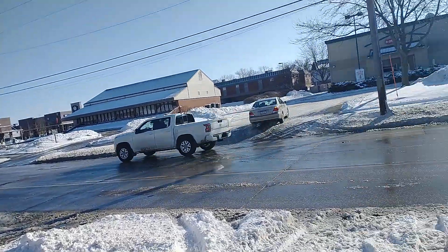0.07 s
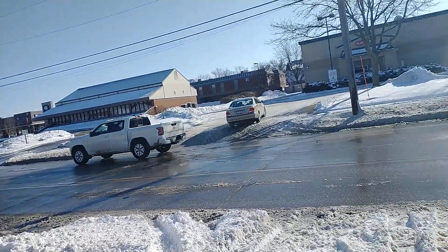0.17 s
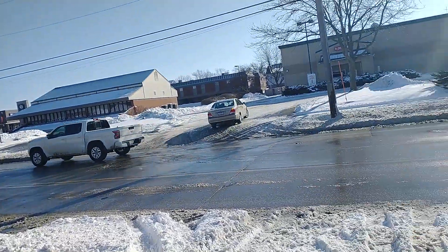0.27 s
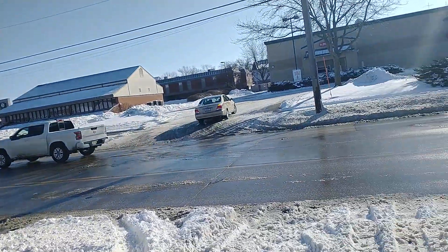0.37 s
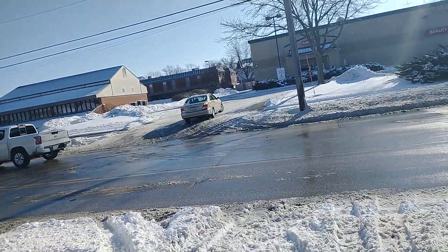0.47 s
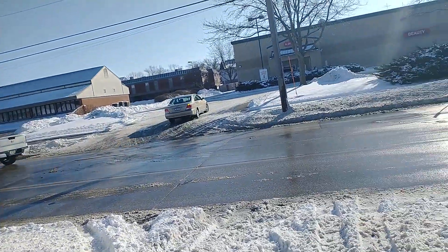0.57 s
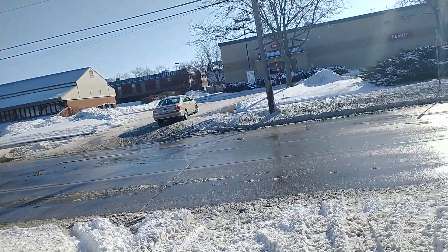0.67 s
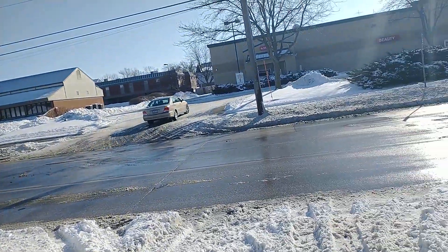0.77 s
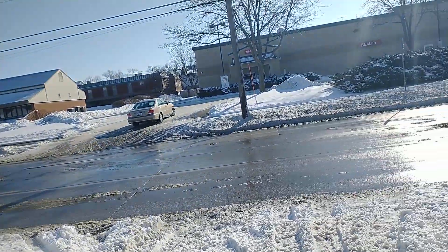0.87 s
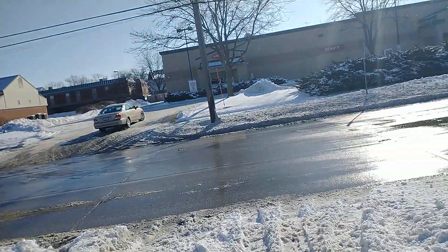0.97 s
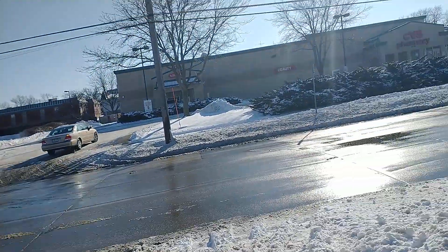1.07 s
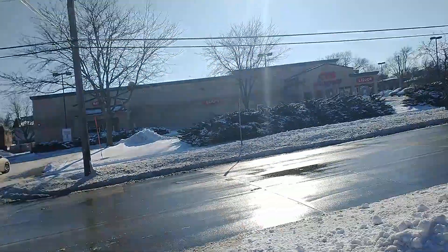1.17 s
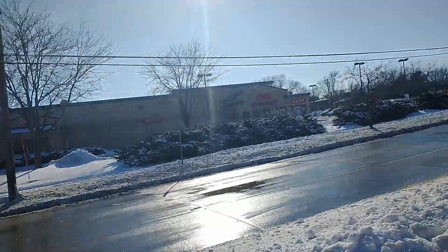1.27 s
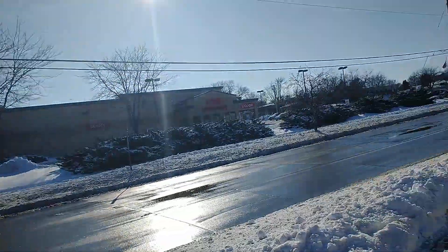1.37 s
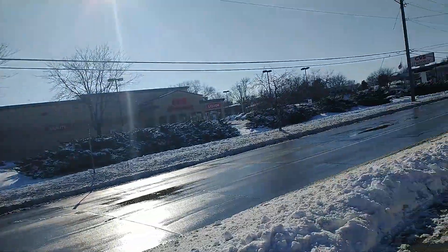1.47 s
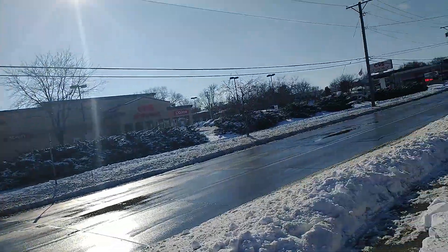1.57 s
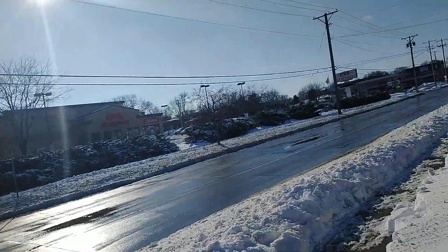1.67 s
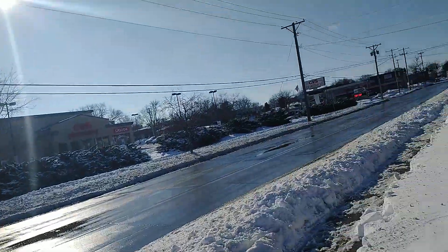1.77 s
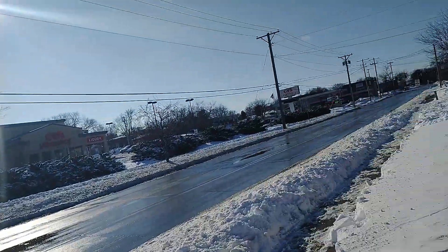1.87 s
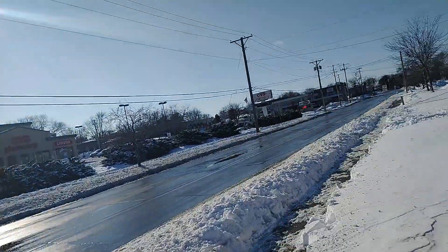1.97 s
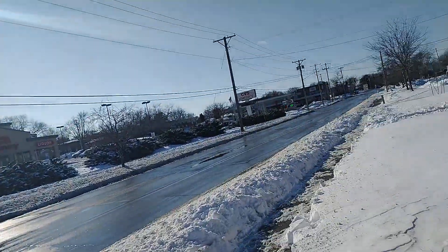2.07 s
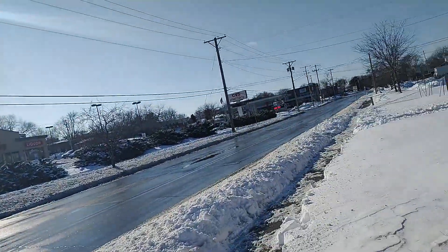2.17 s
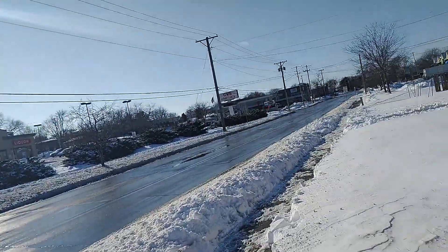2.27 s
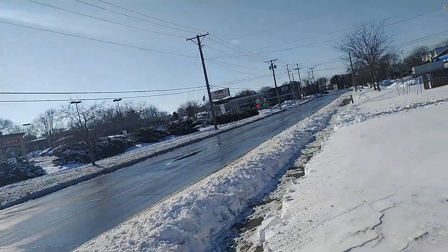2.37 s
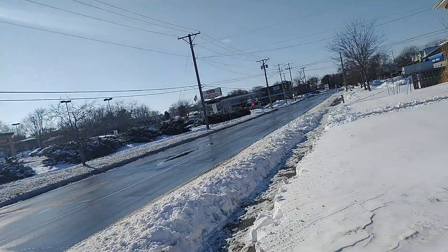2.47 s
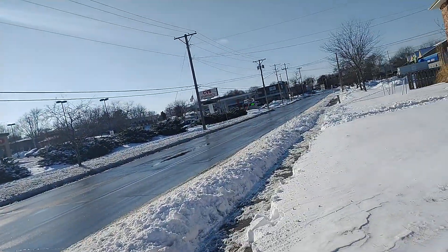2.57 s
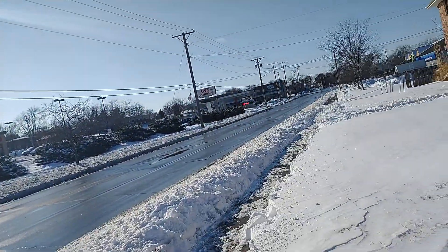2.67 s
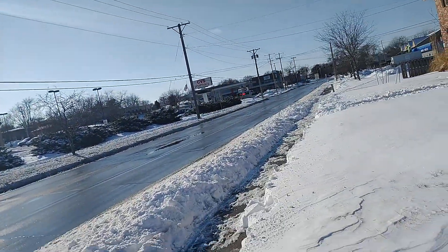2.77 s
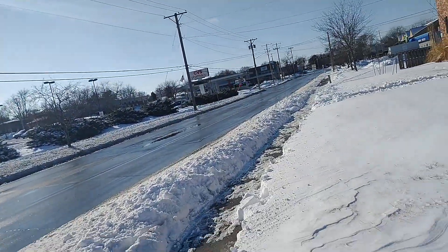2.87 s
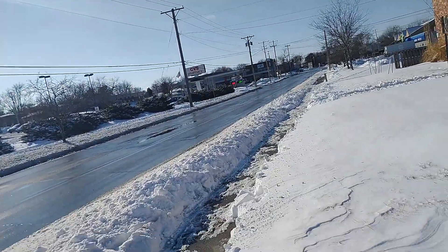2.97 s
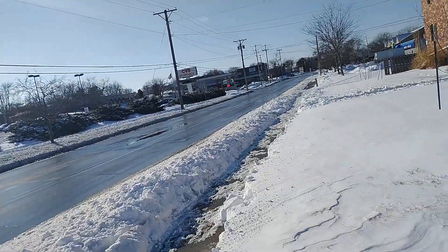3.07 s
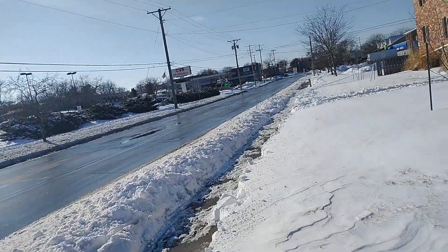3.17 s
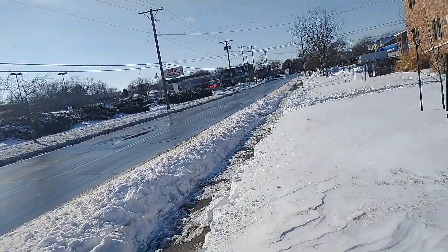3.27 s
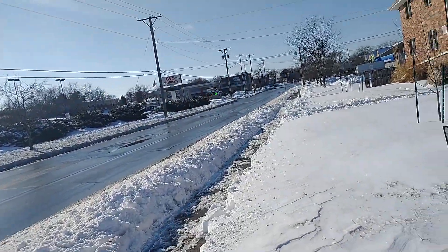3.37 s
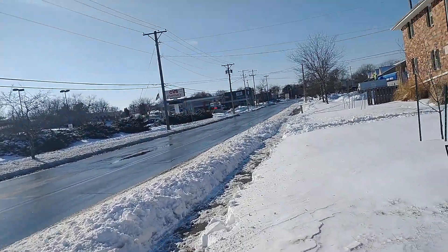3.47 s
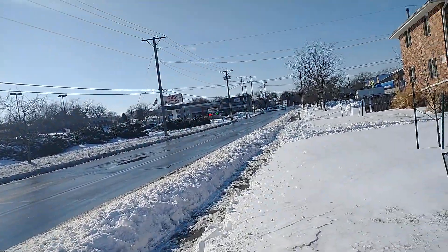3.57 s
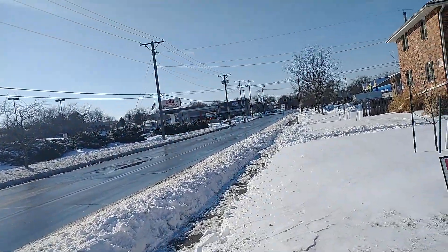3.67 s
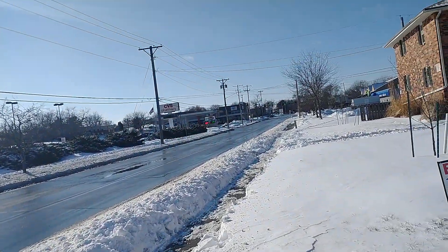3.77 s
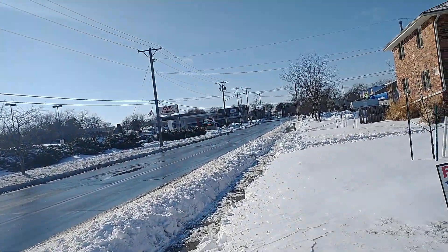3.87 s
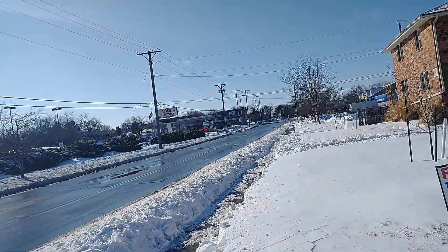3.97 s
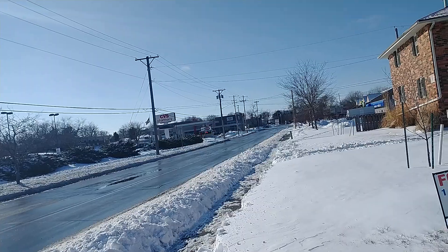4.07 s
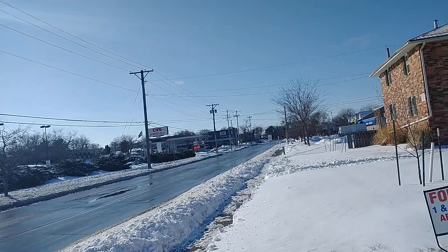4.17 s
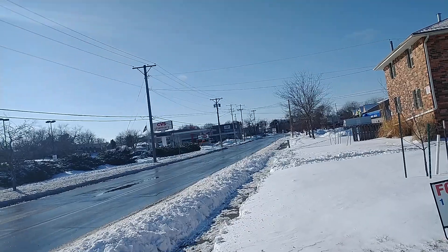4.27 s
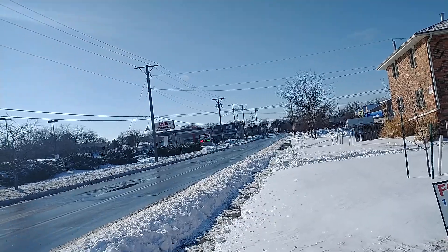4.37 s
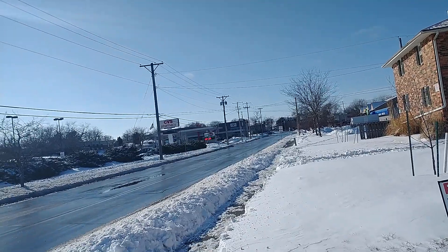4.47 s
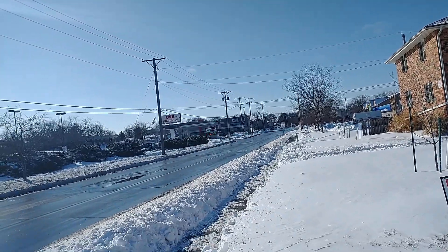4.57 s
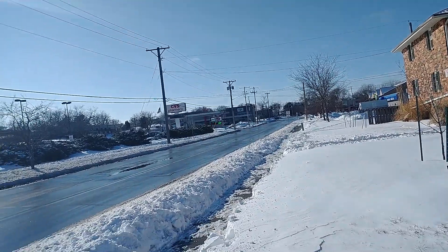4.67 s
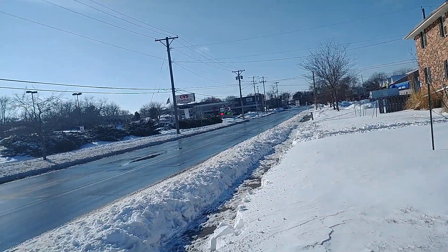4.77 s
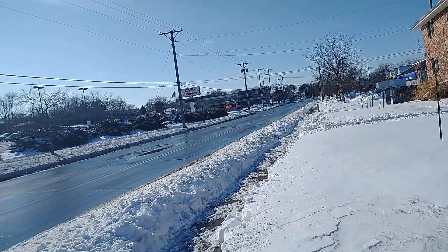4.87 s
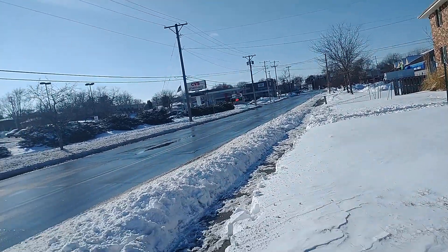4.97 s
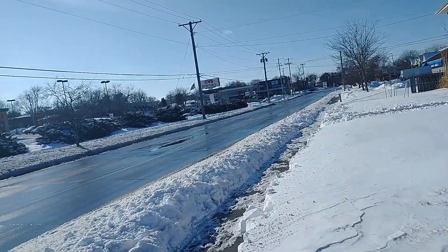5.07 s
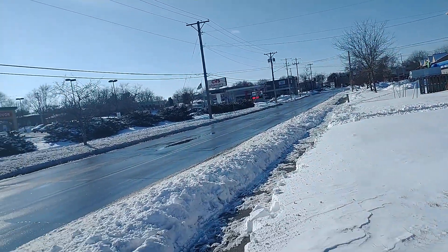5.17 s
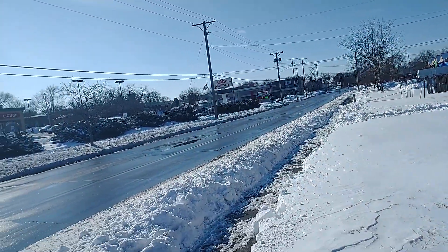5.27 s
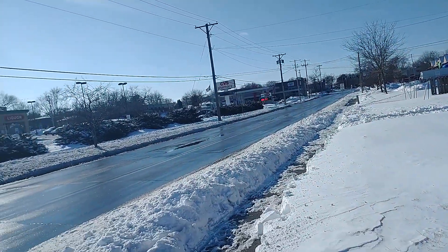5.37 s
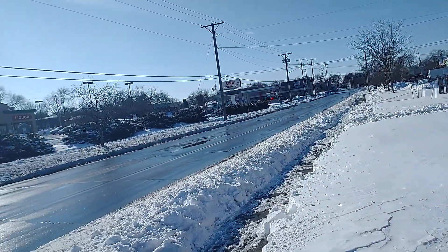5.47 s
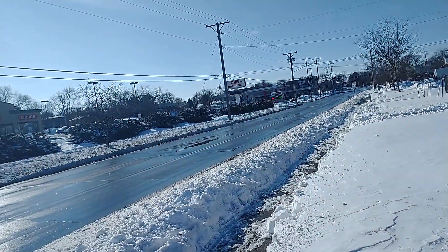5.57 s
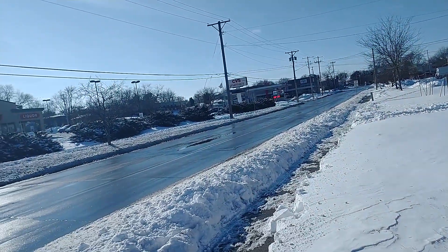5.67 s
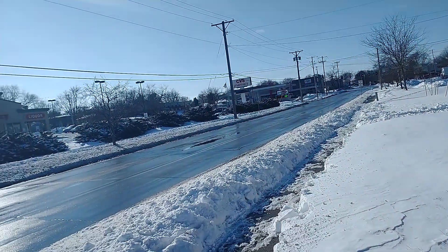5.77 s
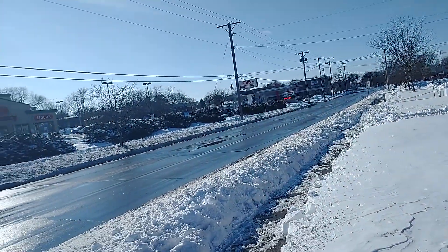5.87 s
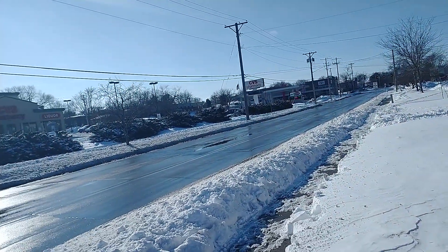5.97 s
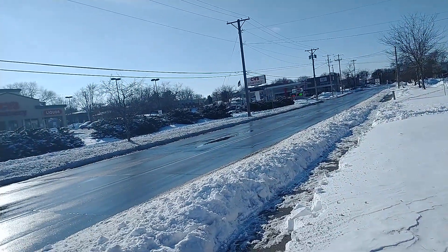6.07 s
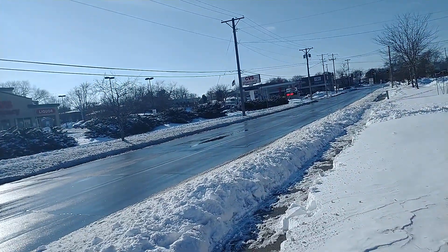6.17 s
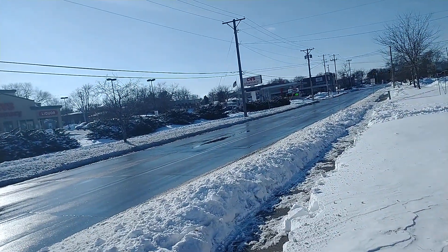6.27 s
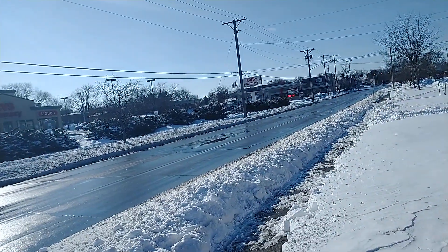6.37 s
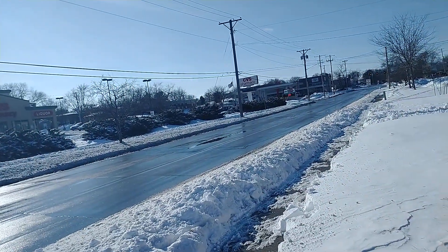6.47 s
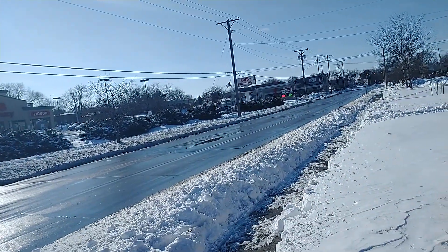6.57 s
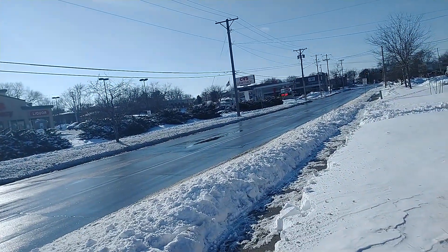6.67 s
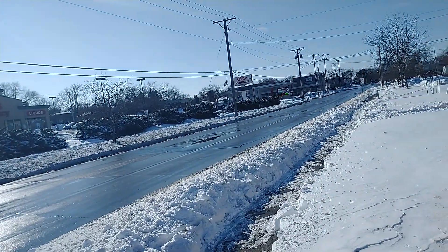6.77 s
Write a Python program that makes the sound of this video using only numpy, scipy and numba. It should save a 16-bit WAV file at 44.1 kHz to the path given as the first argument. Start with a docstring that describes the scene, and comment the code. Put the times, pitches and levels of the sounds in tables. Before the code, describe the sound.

Open snowy roadside, heard by a hand-held stereo phone. From 0 s a pickup pulls away close by: a loud, grainy wet roar of tyres in slush, bright spray hiss and a steady low engine hum around 100 Hz. Dull hollow knocks, like slush lumps, cluster at 0.1-0.3 s and 0.55-0.9 s. The middle roar falls by 1.4 s, while the tread wash shifts brighter as the phone turns; another knock lands near 1.95 s. From 2 to 4 s the tyres dwindle, the hum rises slightly, then fades, with a thin airy hiss and tiny ticks of melting snow at 1.9-3.3 s. Around 4.5-5.5 s it is nearly quiet: soft distant traffic murmur and sparse faint ticks. Short wet crackles come at 5.7, 6.0 and 6.5 s, with small faint knocks, while a distant car's tyre wash and low hum gently swell until the end at 6.8 s.

```python
"""A pickup pulls away along a slushy road, humming in engine orders, past a hand-held phone that turns from it.
Slush lumps knock, perhaps; tyres roar and throw spray in filtered noise, and a road echo carves the treble.
From about 2 s a hand shades the right port, a thin hiss passes and melting snow ticks in puffs of noise.
Near the end wet crackles sound and another car nears from afar; the town murmurs throughout in noise bands.
The two microphone ports hear the road with a lag that follows the turn of the phone."""
import sys
import numpy as np
from scipy import signal
from scipy.io import wavfile
from scipy.ndimage import uniform_filter1d, map_coordinates
from numba import njit

SR = 44100
rng = np.random.default_rng(int(sys.argv[2]) if len(sys.argv) > 2 else 0)


def master_out(mix):
    """Clip the mix to full scale and print it as 16-bit PCM to the path in sys.argv[1]."""
    frames = np.transpose(np.atleast_2d(mix))
    ceiling = np.clip(frames, -1, 1)
    pcm = np.round(ceiling * 32767).astype(np.int16)
    wavfile.write(sys.argv[1], SR, pcm)


N = 300321
T = np.arange(N) / SR


def undb(db):
    """Amplitude gain is the exponential of a level in decibels."""
    return 10 ** (np.asarray(db) / 20)


def unit(x):
    """Normalisation: mean power becomes 1."""
    return x / np.sqrt(np.mean(x ** 2))


def columns(table):
    """Linear interpolation of each column of a curve table, time first, at every sample."""
    s, *rest = np.transpose(table)
    return [np.interp(T, s, column) for column in rest]


def glide(start_s, end_s, a, b):
    """Linear motion from a to b, held outside the two times."""
    return np.interp(T, [start_s, end_s], [a, b])


def shaded(before, during, after):
    """Acoustic shading: a value that changes while the hand shades the right port."""
    shade_s = 1.75, 2.1, 4.7, 5.4  # starts, full, lifts, gone
    return np.interp(T, shade_s, [before, during, during, after])


@njit
def svf(x, g, k):
    """Second-order resonance: a state-variable band-pass with a moving centre, gain 1 there."""
    y, b, l = np.empty(len(x)), 0., 0.  # output, band state, low state
    for i in range(len(x)):
        v = (b + g[i] * (x[i] - l)) / (1 + g[i] * (g[i] + k[i]))
        b, l, y[i] = 2 * v - b, l + 2 * g[i] * v, k[i] * v
    return y


def band(x, hz, width_hz, order=1):
    """Cascaded resonance: each pass of the band-pass steepens the skirts."""
    if x.ndim > 1:
        return np.array([band(channel, hz, width_hz, order=order) for channel in x])
    g = np.tan(np.pi * np.clip(hz, 10, .45 * SR) / SR) + 0 * T
    k = width_hz / hz + 0 * T
    for _ in range(order):
        x = svf(x, g, k)
    return x


def colour(x, hz, width_hz, db):
    """Peaking resonance: adding a band-pass to the direct sound lifts or hollows its centre by db."""
    return x + (undb(db) - 1) * band(x, hz, width_hz)


def walk(rate):
    """Slow random modulation: levels held 1 / rate s and slewed twice; spread about 0.7."""
    k = int(SR / rate)
    held = np.repeat(rng.standard_normal(N // k + 1), k)
    return 0.96 * uniform_filter1d(uniform_filter1d(held, k), k)[:N]


def late(x, samples):
    """Propagation delay: a sound read a moving number of samples late."""
    return map_coordinates(x, [np.arange(N) - samples], order=3, mode="nearest")


def ports(x, lag):
    """Interaural-like delay: one sound as the left and the later right port get it."""
    return np.array([x, late(x, lag)])


def droplets(per_s, spread_db):
    """Shot noise: sparse clicks of widely spread but bounded size, each smeared into a short burst."""
    size_db = spread_db * np.minimum(rng.exponential(size=N), 4.5)
    clicks = (rng.random(N) < per_s / SR) * undb(size_db)
    burst = signal.lfilter([1], [1, -np.exp(-1 / (0.0011 * SR))], clicks)  # decays in 1.1 ms
    return unit(burst * rng.standard_normal(N))


def wide(lag, likeness, grain, per_s, spread_db):
    """Partial coherence: a broad source gives both ports a common share of grainy noise, the rest their own."""
    common, left, right = (rng.standard_normal(N) + grain * droplets(per_s, spread_db) for _ in range(3))
    share = np.clip(likeness, 0, 1)
    return np.sqrt(share) * ports(common, lag) + np.sqrt(1 - share) * np.array([left, right])


def town(lag):
    """Diffuse field: distant traffic and faint drips in half-octave bands; the bass is alike at both ports."""
    # relative spectrum of the murmur: pitch_hz, density_db (per Hz)
    spectrum = [(15, -43), (25, -2), (97, 1.5), (185, -7.5), (531, -7), (754, -14), (962, -5.5),
                (2110, -12.5), (3250, -17.5), (4140, -19), (6380, -23), (7510, -50), (16000, -33)]
    spectrum_hz, spectrum_db = np.transpose(spectrum)
    level_db = -58.5
    common, apart, swell = 0, 0, walk(0.68)
    drips = np.array([droplets(70, spread_db=-1.5) for _ in range(2)])
    air = rng.standard_normal((2, N)) + 0.44 * drips
    for k, hz in enumerate(32 * 2 ** np.arange(0, 9.1, .5)):
        # neighbours in opposite sign join without a dip
        mid, side = (-1) ** k * unit(band(air, hz, hz / 2.15, order=2))
        band_db = np.interp(np.log(hz), np.log(spectrum_hz), spectrum_db) + 10 * np.log10(hz)
        gain = undb(band_db + 0.33 * swell + 0.66 * walk(4.84))
        common = common + gain * mid
        apart = apart + gain * min(0.072 + hz / 1700.0, 0.75) * side
    return unit(np.array([common + apart, late(common - apart, lag)])) * undb(level_db)


def ticks(lag):
    """Impulsive noise: melting snow ticks in soft puffs of treble a few milliseconds long."""
    # ticks before the band-pass: start_s, level_db, left_minus_right_db
    tick_list = [(1.927, -45, 5), (2.327, -48, 4.0), (2.357, -55, 2), (2.7714, -53.5, 4),
                 (2.8063, -53, 3.5), (3.2629, -46.5, 5), (4.589, -52, 3.5), (4.775, -56, 2),
                 (5.689, -58, -2.0), (5.875, -48.5, -1.5), (6.115, -56, -2.5), (6.483, -50, -3.5),
                 (6.517, -51, -3.0)]
    out, t = np.zeros((2, N)), np.arange(int(.04 * SR)) / SR
    for start_s, level_db, pan_db in tick_list:
        i = int(start_s * SR)
        puff = rng.standard_normal(len(t)) * np.exp(-t / 0.0081) * (1 - np.exp(-t / 0.0005))
        out[:, i:i + len(t)] += undb(level_db + np.array([[pan_db], [-pan_db]]) / 2) * puff
    out[1] = late(out[1], lag)
    return band(out, 5000, 8100)


def airy(lag):
    """Full coherence: a thin high hiss that both ports share, stronger at the right."""
    # course of the hiss before panning: time_s, centre_hz, level_db
    hiss_curve = [(2.0, 12410, -85), (2.2, 12400, -59), (2.8, 12800, -68), (3.6, 13120, -69),
                  (3.95, 12720, -78)]
    hz, level_db = columns(hiss_curve)
    hiss = unit(band(wide(lag, 1.0, grain=0.64, per_s=220, spread_db=7.0), hz, 4000, order=2))
    pan_db = np.array([[-2.5], [1.5]])
    return undb(level_db + 1.6 * walk(8.2) + pan_db) * hiss


def splats():
    """Enveloped noise: short wet crackles, band-passed near 3.4 kHz."""
    # crackles before the band-pass: start_s, level_db
    splat_list = [(5.685, -42), (5.965, -43), (6.513, -40.5)]
    out, t = np.zeros(N), np.arange(int(.06 * SR)) / SR
    for start_s, level_db in splat_list:
        i = int(start_s * SR)
        envelope = np.exp(-t / 0.016) * (1 - np.exp(-t / 0.0024))
        out[i:i + len(t)] += undb(level_db) * rng.standard_normal(len(t)) * envelope
    return band(out, 3430, 1950, order=2)


def far_hum():
    """Frequency modulation: the low engine note of the car that nears, a sine of wavering pitch."""
    # course of the note: time_s, pitch_hz, level_db
    hum_curve = [(6.2, 86.2, -85), (6.42, 85.6, -68), (6.47, 87, -62), (6.59, 100.6, -64),
                 (6.81, 104.2, -62)]
    hz, level_db = columns(hum_curve)
    level = np.sqrt(2) * undb(level_db + 2.0 * walk(12))
    return level * np.cos(2 * np.pi * np.cumsum(hz * (1 + 0.0097 * walk(11))) / SR)


def knocks():
    """Damped free vibration: dull knocks, slush lumps perhaps, ring a few cycles."""
    # rings before the soft onset and decay: start_s, level_db, pitch_hz
    knock_list = [(0.101, -14, 806), (0.152, -25, 750), (0.203, -17, 680), (0.312, -14.5, 830),
                  (0.553, -22, 826), (0.794, -15.5, 1099), (0.862, -14.5, 810), (0.901, -17, 1100),
                  (1.955, -20.5, 1960), (2.387, -38, 730), (3.234, -30, 791), (4.547, -41, 836),
                  (4.767, -42, 1357), (4.982, -36, 1270), (5.79, -42, 2120), (6.116, -45, 2080),
                  (6.263, -42, 750), (6.337, -44, 1750), (6.37, -44, 1990), (6.46, -50, 65),
                  (6.518, -44, 1920), (6.565, -41, 850), (6.58, -32, 1880), (6.738, -38, 2000),
                  (6.779, -36, 1800)]
    out, t = np.zeros(N + SR), np.arange(int(.15 * SR)) / SR
    for start_s, level_db, hz in knock_list:
        i = int(start_s * SR)
        envelope = np.exp(-t * hz / 3.4) * (1 - np.exp(-t / 0.00059))
        out[i:i + len(t)] += undb(level_db) * np.sin(2 * np.pi * hz * t) * envelope
    return out[:N]


def tyres(hump_hz, hump_width_hz, notch_hz, lag, tread_like, spray_like):
    """Comb interference: slush and spray noise, whose wet-road echo weakens one treble band."""
    # layer levels: time_s, boom_db (carcass), rumble_db, roar_db (slush), churn_db (slush), tread_db, spray_db
    tyre_curve = [(0.0, -39, -45, -28, -34.5, -33, -36.5), (0.4, -46, -47, -32.5, -39, -33, -37),
                  (0.6, -47, -49, -34.5, -37.5, -31.5, -36.5), (0.76, -45, -47, -36.5, -39, -30.5, -37),
                  (0.9, -46, -47, -36, -32.5, -32, -38), (1.15, -51, -47, -35, -37.5, -33.5, -38.5),
                  (1.4, -50, -47, -47.5, -44, -33.5, -41.5), (1.75, -51, -50, -45, -58, -36.5, -42.5),
                  (1.85, -59, -49.5, -45, -74, -35, -49.5), (2.25, -53, -55.5, -51.5, -66, -38, -55),
                  (2.45, -51, -58, -53, -55, -48.5, -59.5), (2.9, -54.5, -61, -57, -68, -53, -62.5),
                  (3.3, -50, -62.5, -53, -60, -48, -76), (3.8, -53.5, -63.5, -55.5, -57, -46.5, -64.5),
                  (4.3, -63, -68.5, -61.5, -61, -55.5, -60.5), (4.8, -76, -79.5, -67, -82, -62, -62),
                  (5.3, -79, -77.5, -64.5, -72, -60.5, -66), (5.8, -68.5, -77, -63.5, -81, -59, -63.5),
                  (5.96, -68, -75, -65.5, -70, -61.5, -62.5), (6.1, -62, -68, -60, -60, -54.5, -60.5),
                  (6.23, -65, -75, -67, -64, -59, -66.5), (6.36, -62, -69, -60, -60, -56, -65),
                  (6.47, -61.5, -68, -66, -60, -54, -62.5), (6.57, -61, -67, -54.5, -54, -54, -62),
                  (6.65, -63, -70.5, -67, -62, -57, -59.5), (6.81, -59, -68, -55, -57, -52, -58.5)]
    boom_db, rumble_db, roar_db, churn_db, tread_db, spray_db = columns(tyre_curve)
    # both mists follow the spray; the finest mist of the far car is weaker
    mist_db = -57 + (spray_db + 50)
    fine_db = -62.5 + 0.72 * (spray_db + 50) + glide(4.6, 5, 2, -14)

    def slush(like):
        """Coarse grains."""
        return wide(lag, like, grain=0.6, per_s=200, spread_db=2.0)

    def water(like):
        """Grains of more even size."""
        return wide(lag, like, grain=0.61, per_s=160, spread_db=0.5)

    body = slush(0.91)
    far_boom = glide(5, 5.7, 0, 0.58) * unit(band(body, 225, 130, order=2))  # the far car booms higher too
    boom = unit(band(slush(0.79), 72, 107, order=2)) + far_boom
    rumble = unit(band(body, 416.0, 286, order=2)) - 1.42 * unit(band(body, 159.0, 170, order=2))

    slosh_db = 0.89 * walk(24.74)  # uneven slush depth shakes roar and tread together
    roar = unit(band(slush(0.95), 775, 272, order=2))
    churn = unit(band(slush(0.87), 1120, 510, order=2))
    tread = unit(band(slush(tread_like), hump_hz, hump_width_hz, order=2))

    splash_db = 1.78 * walk(10) + 0.81 * walk(35)
    coarse_like = np.minimum(1.6 * spray_like, .97)
    spray = unit(band(water(coarse_like), 4250, 3380, order=2))
    high = undb(spray_db + splash_db) * spray
    high = high + undb(tread_db + slosh_db + 0.76 * walk(15)) * tread
    echo = np.array([late(channel, SR / notch_hz / 2) for channel in high])  # half a period at the notch
    high = (high + 0.44 * echo) / 1.29

    # the finest mist comes from all over the road, so the ports share less of it
    mist = undb(mist_db) * unit(band(water(.75 * spray_like), 8440, 6400, order=2))
    mist = mist + undb(fine_db) * unit(band(water(.45 * spray_like), 12300, 9500, order=2))
    low = undb(boom_db) * boom + undb(rumble_db) * rumble
    middle = undb(slosh_db) * (undb(roar_db) * roar + undb(churn_db) * churn)
    return low + middle + high + undb(splash_db + 1.16 * walk(9)) * mist


def engine():
    """Harmonic series: orders of the firing cycle, wavering a little with uneven combustion."""
    # course: time_s, cycle_hz, hum_db (multiple 2), overtone_db (before tilt), tilt_db (per multiple)
    engine_curve = [(0.0, 50.8, -30.5, -39, -0.5), (0.15, 49.4, -32, -38, -1),
                    (0.45, 48.17, -36.5, -38.5, -1), (0.75, 46.8, -38.5, -40.5, -2.5),
                    (1.1, 46.62, -37.5, -42, -1.5), (1.5, 46.8, -49, -45.5, 2), (1.9, 47.35, -46, -45, 2),
                    (2.15, 49.45, -42, -48, 0.5), (2.4, 49.5, -40.5, -51, -1.5),
                    (2.55, 50.4, -44, -57.5, -2), (2.8, 51.33, -44.5, -59, -3.5),
                    (3.25, 53, -39, -64.5, -6), (3.72, 53.7, -39.5, -68, -10), (3.79, 53.1, -47, -79, 1),
                    (4.1, 54.2, -53.5, -76, 1.5), (4.4, 55, -64, -87, -7), (5.0, 53.9, -63.5, -90, 1),
                    (5.3, 46.56, -60, -79, 6.5), (5.5, 45.44, -66.5, -76.5, -1), (5.8, 42.1, -73, -78, 0)]
    # offsets of the upper orders: multiple, offset_db
    overtones = [(3, -0.5), (4, 1), (5, -5), (6, -1.5)]
    hz, hum_db, over_db, tilt_db = columns(engine_curve)
    phase = 2 * np.pi * np.cumsum(hz * (1 + 0.0035 * walk(14.05))) / SR
    fade = np.clip((engine_curve[-1][0] - T) / 0.19, 0, 1)
    orders = [(2.05, hum_db)]  # sounds at multiple 2; the fraction only sets its phase
    for k, offset_db in overtones:
        orders.append((k, over_db + offset_db + tilt_db * (k - 4.5) + 2.05 * walk(4.92)))
    tones = 0
    for k, level_db in orders:
        tones = tones + undb(level_db + 1.75 * walk(14)) * np.cos(round(k) * phase - 0.3904 * k * k)
    return np.sqrt(2) * fade * tones


def right_facing(x, hump_hz):
    """Near-field resonance and shading: the turn and the hand colour the road at the right port."""
    # early moving colours: time_s, hollow_hz, hollow_db, bright_hz, bright_db
    turn_colours = [(.2, 2380, 1, 5500, 2), (.6, 2430, -14, 5460, 2), (1.1, 3001, -1, 5030, 1),
                    (1.4, 3700, -3, 6900, 8), (1.75, 4700, 3, 8180, 3), (1.95, 5000, 2, 9000, 0)]
    # bands the hand takes while it shades the port: centre_hz, width_hz, gain_db
    shade_dips = [(5060, 1400, -7), (8400, 2200, -6), (10700, 520, -5)]
    x = colour(x, 0.84 * hump_hz + 750, 1330, 3.5)  # the cupped hand rings near the hump
    hollow_hz, hollow_db, bright_hz, bright_db = columns(turn_colours)
    x = colour(x, hollow_hz, 1140, hollow_db)
    x = colour(x, bright_hz, 2200, bright_db)
    for hz, width_hz, db in shade_dips:
        x = colour(x, hz, width_hz, shaded(0, db, 0))
    return colour(x, shaded(6050, 5800, 8200), 3700, shaded(1, -1.5, 4))


def left_facing(x):
    """Diffraction: a dulled band rises as the phone turns; an all-pass delays the bass at the left port."""
    x = colour(x, glide(.9, 1.4, 1500, 2700), 1660, -3.5)
    # long waves bend round the phone, so the bass leads less at the left port than the treble
    bend = np.tan(np.pi * 1250 / SR)
    return signal.lfilter([bend - 1, bend + 1], [bend + 1, bend - 1], x)


def scene():
    """Superposition: the road reaches the right port late and coloured by how phone and hand face it."""
    # turn of the phone: time_s, lag_samples (right port), tread_likeness (0-1), spray_likeness (before scaling)
    turn = [(0, 4, .68, .2), (.5, 14.5, .78, .16), (.8, 22, .82, .2), (1.0, 28, .9, .33),
            (1.2, 31.5, .98, .6), (1.5, 29.3, .98, .68), (1.9, 26.2, .98, .42), (2.3, 20.8, .94, .28),
            (2.9, 20, .75, .25), (3.5, 19.6, .72, .22), (4.2, 20.5, .65, .25), (4.9, 25.5, .6, .45),
            (5.4, 28, .7, .66), (5.9, 28.9, .88, .68), (6.81, 29.5, .92, .7)]
    # early band near 2 kHz between two hollows: centre_hz, width_hz, gain_db
    early_dips = [(1770, 300, -5.5), (2070, 230, 5.5), (2430, 190, -4)]
    lag, *likeness = columns(turn)
    # tread band and echo notch glide as the pickup draws away
    hump_hz = glide(.95, 2.3, 1130, 2300) + glide(1.5, 2.5, 5, -420)
    hump_width_hz = glide(2.0, 2.7, 1250, 2750) + glide(5, 5, -17, -900)  # narrower for the far car
    notch_hz = glide(1.0, 1.9, 3220, 5120)

    road = ports(engine() + far_hum() + knocks() + splats(), lag)
    road = road + tyres(hump_hz, hump_width_hz, notch_hz, lag, *likeness)
    road[1] = right_facing(road[1], hump_hz)
    road[0] = left_facing(road[0])
    road = colour(road, 3530, shaded(590, 700, 490), shaded(-7, -5, 4.5))
    for hz, width_hz, db in early_dips:
        road = colour(road, hz, width_hz, glide(0.55, 0.76, db, 0))
    road[0] = colour(road[0], 2080, 1200, glide(-0.7, -2, 5, -1))

    # the town lies a little nearer the front than the road, so it lags 3.8 samples less
    around = road + airy(lag) + town(lag - 3.8)
    around = colour(around, 11900, 920, shaded(0, -5, 0))  # a hollow under the airy band
    return around + ticks(lag)


def record(dry):
    """Linear filtering: each port has its own resonances; the recorder cuts the deepest bass and the top."""
    # resonances of each port: centre_hz, width_hz, gain_db
    left_port = [(1840, 59, -3.5), (2806, 180, 6), (6480, 490, 4)]
    right_port = [(1940, 160, -1), (2030, 67, 2.5), (4980, 2240, -3.5), (10400, 700, 1.5),
                  (12400, 1300, -6)]
    out = []
    for x, port in zip(dry, (left_port, right_port)):
        for hz, width_hz, db in port:
            x = colour(x, hz, width_hz, db)
        out.append(x)
    bass_cut = signal.butter(4, 42., "high", fs=SR, output="sos")
    top_cut = signal.ellip(8, .2, 70, 15800, fs=SR, output="sos")
    return signal.sosfilt(top_cut, signal.sosfilt(bass_cut, np.array(out)))


dry = scene()
out = record(dry)
master_out(out)
```